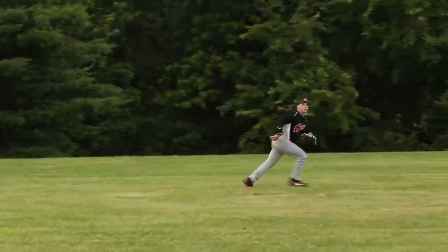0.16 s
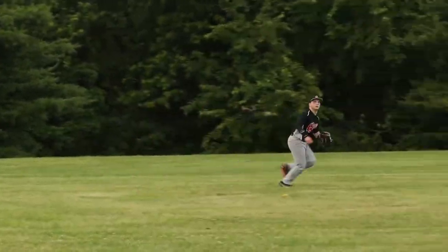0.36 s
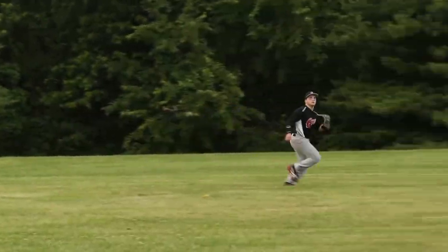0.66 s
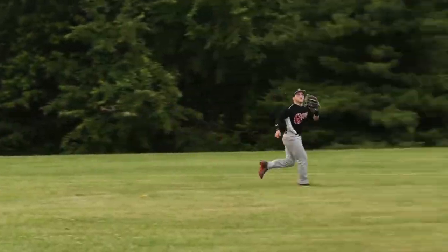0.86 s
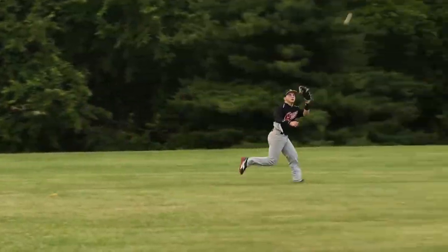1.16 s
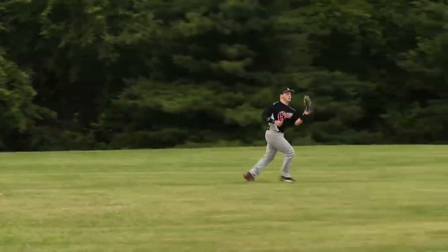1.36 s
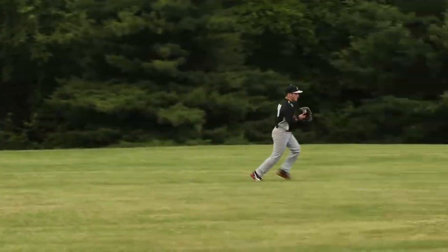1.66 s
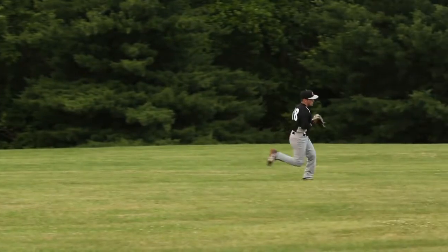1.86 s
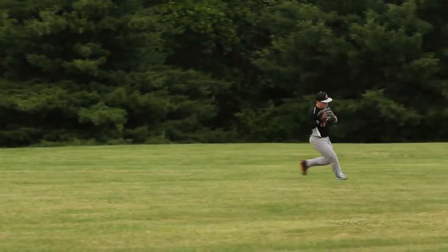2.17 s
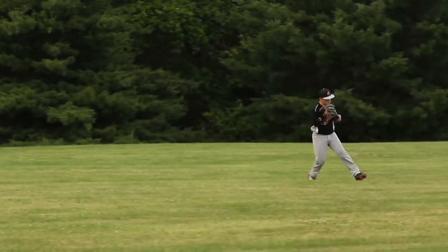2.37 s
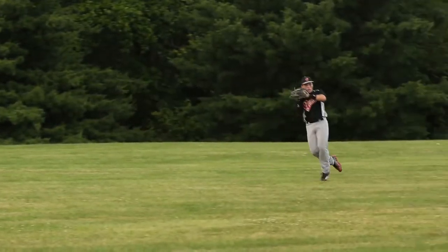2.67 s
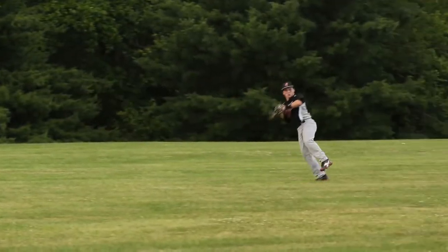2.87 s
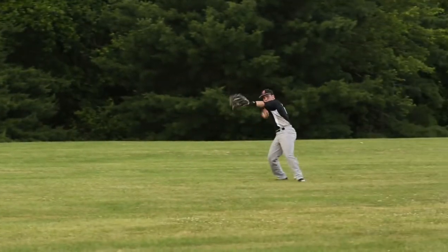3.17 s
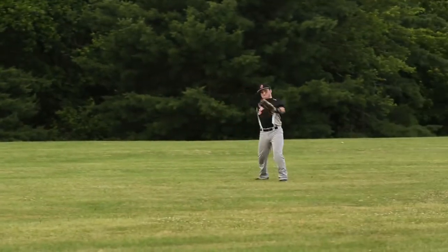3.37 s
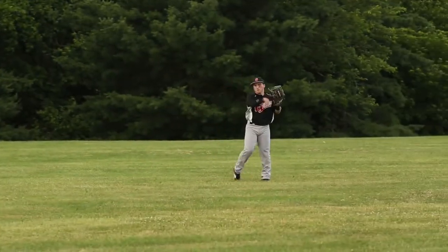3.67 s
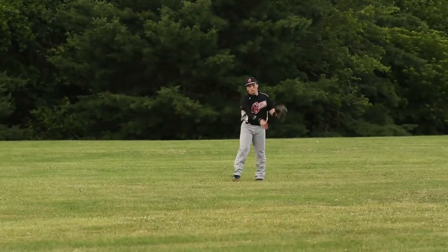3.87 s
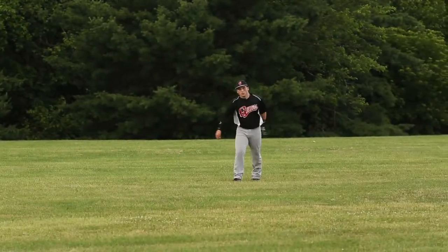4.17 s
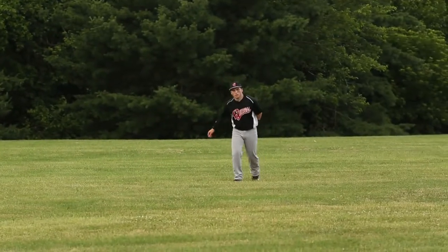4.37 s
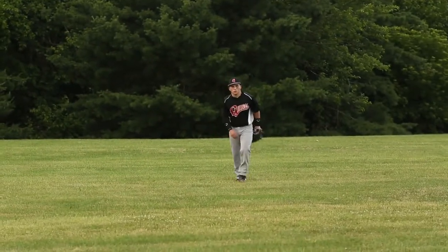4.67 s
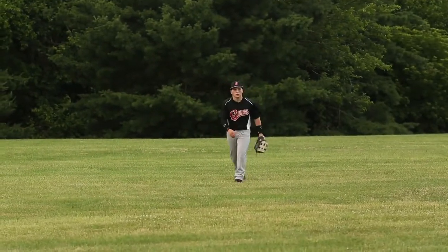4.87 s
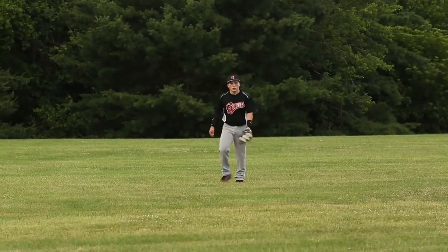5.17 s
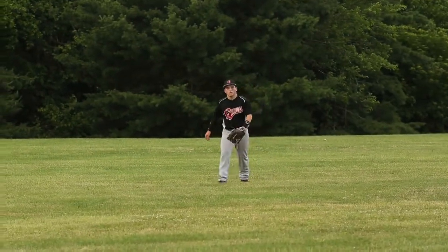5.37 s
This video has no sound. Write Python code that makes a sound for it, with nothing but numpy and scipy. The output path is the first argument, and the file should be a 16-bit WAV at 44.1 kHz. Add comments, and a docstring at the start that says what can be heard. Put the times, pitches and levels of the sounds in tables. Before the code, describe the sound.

On an open grass field, a distant engine drones, slowly rising in pitch over low road rumble and wind in the trees. A fielder runs with faint cleat crunches and sleeve swishes, then catches a baseball with a light leather snap. Small birds whistle softly with a little echo. The engine shifts gear and drops in pitch, and at the end a ball smacks sharply into a glove close to the microphone.

```python
"""A baseball smacks into a leather glove close by: a sharp slap over the falling thump of the padding.
Before it, a fielder runs over the grass, cleats crunching and sleeves swishing, and makes a lighter catch
that rings the pocket. Far off, a V8's exhaust drones up through a gear and shifts, with a lower motor
beneath it. Small birds whistle from the edge of a wood that echoes them, over a bed of road rumble,
far tyres and wind in the trees."""
import sys
import numpy as np
from scipy import signal
from scipy.fft import rfft, irfft
from scipy.io import wavfile

SR = 44100
rng = np.random.default_rng(int(sys.argv[2]) if len(sys.argv) > 2 else 0)


def pcm_store(signal):
    """Save signal as 16-bit PCM."""
    levels = np.round(np.clip(np.atleast_2d(signal), -1, 1) * 32767)
    wavfile.write(sys.argv[1], SR, levels.astype(np.int16).T)


N = 242991
T = np.arange(N) / SR

# tone of the road rumble: (frequency [Hz], relative level [dB])
RUMBLE_SPECTRUM = [(20, -19), (32, -9), (50, -0.5), (70, 4), (100, 6.5), (140, -1), (200, 1.5), (260, -8),
                   (340, -21.5), (600, -43)]
# tone of far tyres and wind in the trees: (frequency [Hz], relative level [dB])
WASH_SPECTRUM = [(150, 3), (300, 0.5), (420, -3), (640, 0.5), (900, 0), (1250, 1.5), (1700, -4),
                 (2400, -10), (3700, -16.5), (4600, -24.5), (6000, -33), (9000, -40), (15000, -26)]
# soft rustles of the player's clothes and the grass, plus one low, distant whoosh:
# (time [s], half length [s], centre [Hz], width [Hz], level [dB])
RUSTLE_SWELLS = [(.3, 0.24, 3140, 1900, -67.5), (0.445, .11, 2200, 1600, -60.5),
                 (1.357, .14, 3600, 1100, -65), (2.147, 0.32, 669, 190, -61.5),
                 (5.2, 0.13, 3520, 1700, -66.5)]
# single bird calls: (time [s], length [s], start pitch [Hz], end pitch [Hz], level [dB], echo send [dB])
WHISTLES = [(1.32, .1, 4170, 4150, -67, -10), (1.555, .06, 4420, 4340, -68, -8),
            (2.455, .028, 2050, 2070, -60, -10), (2.98, .1, 2930, 2640, -59, -15),
            (3.04, .09, 2970, 2480, -54.5, -15), (4.155, .075, 4740, 4700, -63, -2),
            (4.45, .025, 3250, 3050, -64, -8), (4.54, .1, 2640, 2730, -66, -8),
            (4.595, .08, 3950, 3990, -63, -10), (4.595, .095, 3800, 3790, -61, -4)]
# the lower motor speeds up and slackens: (time [s], firing rate [Hz], level [dB])
LOW_MOTOR_CURVE = [(2.3, 78, -72), (2.6, 79.3, -52.5), (3.65, 82.9, -48.5), (3.95, 84.7, -56.5),
                   (4.18, 84.4, -49), (5, 75.3, -58), (5.51, 73.7, -56)]
# the V8 nears and recedes, with a flare as the throttle lifts: (time [s], level [dB])
V8_ENVELOPE = [(0, -50.5), (.5, -47), (1.3, -41.5), (2.15, -40.5), (3, -42.5), (4.05, -48), (4.27, -52.5),
               (4.39, -41.5), (4.57, -55), (4.78, -49.5), (5.51, -49.5)]
# partials from the uneven firing of the two banks: (multiple of the engine cycle [x], base level [dB])
LOPE_PARTIALS = [(4, -56), (5, -51), (6, -56.5), (7, -69), (9, -68.5), (10, -58.5), (12, -52.5)]
# how exhaust and ground colour those partials: (frequency [Hz], gain [dB])
EXHAUST_EQ = [(70, -1), (95, 0), (112, -3), (130, -0.5), (145, -5.5), (165, 2), (225, -5.5), (252, -4.5),
              (268, -19.5), (298, -14), (320, -30)]
# cleats landing in the grass: (time [s], level [dB])
FOOTFALLS = [(.233, -47), (0.453, -51), (1.0305, -43), (4.888, -50.5)]
# tone of a cleat's crunch: (frequency [Hz], relative level [dB])
TURF_SPECTRUM = [(600, -11), (1300, 4), (2000, -3), (3000, -5), (3900, -2), (5000, -13.5), (7500, -19),
                 (12000, -30)]
# sleeve and glove swishes: (time [s], level [dB], t60 [s])
CLOTH_SWISHES = [(1.202, -59.5, 0.088), (1.286, -52.5, 0.042), (1.351, -55.5, .08), (1.401, -56, .06),
                 (1.488, -50, 0.029), (1.558, -54.5, .04), (1.614, -57, .06), (2.296, -56, 0.05),
                 (2.66, -62, .07)]
# resonances of the fielder's glove: (frequency [Hz], level [dB], t60 [s])
POCKET_MODES = [(284, -36, 0.017), (1050, -21, 0.02), (1345, -13, 0.0189), (1685, -17, 0.0171),
                (2428, -21, 0.0081), (3259, -5, 0.0114), (3821, -15, 0.0127), (5734, -18, 0.0076),
                (6516, -21, 0.0063)]
# the ball meets the web, seats in the pocket, the glove shuts: (time [s], gain [dB], contact time [s])
POCKET_HITS = [(1.46879, -23, 3.8e-05), (1.47115, -11, 7.6e-05), (1.47196, 4, 0.000282),
               (1.47311, 1, 8.8e-05), (1.4755, -13, 6.9e-05), (1.47631, -12, 0.000104),
               (1.47867, -8, 0.00017)]
# resonances of the near glove: (frequency [Hz], level [dB], t60 [s])
LEATHER_MODES = [(902, -23, 0.0119), (1445, -32, 0.0228), (2130, -19, 0.0065), (3248, -16, 0.0046),
                 (3690, -12, 0.0085), (4920, -23, 0.0063), (6199, -14, 0.0038), (7328, -21, 0.0046),
                 (8527, -13, 0.0038)]
# the ball strikes the near glove and the leather snaps round it: (time [s], gain [dB], contact time [s])
SLAP_HITS = [(5.38372, 0, 4e-05), (5.38415, -17, 2.8e-05)]


def undb(db):
    """Decibels to gain."""
    return 10 ** (np.asarray(db) / 20)


def unit(x):
    """Scale to an rms of 1."""
    return x / np.sqrt(np.mean(x ** 2))


def curves(table):
    """Automation lanes: each column after the first, ramped between its time points."""
    times, *columns = np.transpose(table)
    return [np.interp(T, times, column) for column in columns]


def eq_gain(points, hz):
    """Gain of an EQ curve at the given frequencies."""
    f, db = np.transpose(points)
    return undb(np.interp(np.log(hz + 1), np.log(f), db))


def drift(rate_hz):
    """Smooth random modulation of rms about 1, moving about rate_hz times a second."""
    f = np.arange(N + 1) * SR / (2 * N)
    return unit(irfft(rfft(rng.standard_normal(2 * N)) * np.exp(-(f / rate_hz) ** 2)))[:N]


def band(hz, width_hz):
    """Band-passed noise of rms 1."""
    f = np.arange(N // 2 + 1) * SR / N + 1
    return unit(irfft(rfft(rng.standard_normal(N)) / (1 + ((f - hz ** 2 / f) / width_hz) ** 2), N))


def noise_bed(points, flicker_db, flicker_hz):
    """Shaped noise of rms 1 whose octaves swell and sink on their own."""
    f = np.arange(N // 2 + 1) * SR / N
    spectrum = rfft(rng.standard_normal(N)) * eq_gain(points, f)
    octaves = (np.maximum(0, 1 - abs(np.log2(f + 1) - k)) for k in range(4, 15))
    return unit(sum(irfft(spectrum * octave, N) * undb(flicker_db * drift(flicker_hz))
                    for octave in octaves))


def fade(t, t60):
    """Exponential decay by 60 dB in t60."""
    return np.exp(-np.log(1000) * t / t60)


def attack(t, rise_s):
    """Rounded onset from 0 towards 1."""
    return 1 - np.exp(-t / rise_s)


def swell(s, half_length):
    """A smooth rise and fall centred on time s."""
    return np.exp(-((T - s) / half_length) ** 2 / 2)


def add(out, s, x):
    """Mix x into out from time s on."""
    i = int(np.clip(s * SR, 0, N - 1))
    out[i:i + len(x)] += x[:N - i]


def ring(modes, t):
    """Damped resonances, t seconds after a hit."""
    return sum(undb(db) * fade(t, t60) * np.cos(2 * np.pi * hz * t) for hz, db, t60 in modes)


def strike(modes, hits):
    """Each hit rings the same modes; a longer, softer contact sounds duller."""
    out, t = np.zeros(N), T[:SR // 10]
    f = np.arange(len(t) + 1) * SR / (2 * len(t))
    response = rfft(ring(modes, t), 2 * len(t))
    for s, db, contact_s in hits:
        softened = response / (1 + 2j * np.pi * f * contact_s) ** 2
        add(out, s, undb(db) * irfft(softened)[:len(t)])
    return out


def ambience(rumble_db=-49.5, build_db=7, build_s=0.21, wash_db=-52, rustle_db=-71):
    """The bed: road rumble easing in, an even wash of tyres and trees, grass and clothes rustling."""
    rumble_gain = undb(rumble_db - build_db * np.exp(-T / build_s))
    rumble = rumble_gain * noise_bed(RUMBLE_SPECTRUM, flicker_db=1.0, flicker_hz=4.5)
    wash = undb(wash_db) * noise_bed(WASH_SPECTRUM, flicker_db=0.83, flicker_hz=3.5)
    rustle = undb(rustle_db + 2.14 * drift(35)) * band(hz=3460, width_hz=1700)
    return rumble + wash + rustle


def rustle_swells(flicker_db=2.5):
    """Soft rustles of clothes and grass and one low, distant whoosh, each swelling in its own band."""
    return sum(undb(db + flicker_db * drift(18)) * swell(s, half_length) * band(hz, width_hz)
               for s, half_length, hz, width_hz, db in RUSTLE_SWELLS)


def trill(start_s=.035, period_s=.1215, note_s=.032, glide_hz=(4810, 4470), first_db=-64, send_db=-5):
    """One bird repeats a short falling note, a little weaker each time; rows as in WHISTLES."""
    count, fade_db_per_s = 8, 5
    return [(start_s + s, note_s, *glide_hz, first_db - fade_db_per_s * s, send_db)
            for s in period_s * np.arange(count)]


def birds(wood_t60=0.75, wood_build_s=.03, waver=0.0052):
    """Gliding whistles, scattered into a reverb tail by the trunks of the wood."""
    direct, send = np.zeros(N), np.zeros(N)
    wobble = 1 + waver * drift(160)
    for s, length, start_hz, end_hz, db, send_db in trill() + WHISTLES:
        progress = np.linspace(0, 1, int(length * SR))
        glide_hz = start_hz + (end_hz - start_hz) * progress
        hz = glide_hz * np.roll(wobble, -int(s * SR))[:len(progress)]
        envelope = undb(db) * np.sqrt(2) * np.sin(np.pi * progress)
        note = envelope * np.sin(2 * np.pi * np.cumsum(hz) / SR)
        add(direct, s, note)
        add(send, s, undb(send_db) * note)
    tail = rng.standard_normal(SR) * fade(T[:SR], wood_t60) * attack(T[:SR], wood_build_s)
    return direct + signal.fftconvolve(send, tail / np.linalg.norm(tail))[:N]


def low_motor(waver=0.011, flutter_db=2.5):
    """A low hum far off: only the motor's firing tone carries."""
    hz, db = curves(LOW_MOTOR_CURVE)
    phase = 2 * np.pi * np.cumsum(hz * (1 + waver * drift(6.7))) / SR
    return np.sqrt(2) * undb(db + flutter_db * drift(3.2)) * np.sin(phase)


def v8_firing_hz(start_hz=172.95, climb_hz_per_s=13.1, shift_at_s=4.27, shift_s=.48, next_gear_hz=148.6):
    """The pitch climbs evenly under full throttle, slides down through the shift, then holds."""
    climb = start_hz + climb_hz_per_s * np.minimum(T, shift_at_s)
    progress = np.clip((T - shift_at_s) / shift_s, 0, 1)
    return climb + (next_gear_hz - climb) * np.sin(np.pi / 2 * progress) ** 1.6


def v8(lope_follow=0.2, fading_db=2, flutter_db=1.27, waver=0.0026):
    """Eight firings a cycle give the lead tone; uneven banks add partials that fade in the moving air."""
    db, = curves(V8_ENVELOPE)
    cycle_hz = v8_firing_hz() / 8
    phase = 2 * np.pi * np.cumsum(cycle_hz * (1 + waver * drift(8.1))) / SR
    out = undb(db + flutter_db * drift(8)) * np.sin(8 * phase)
    for order, base_db in LOPE_PARTIALS:
        gain = undb(base_db + lope_follow * (db - db.mean()) + fading_db * drift(1.7))
        partial = np.sin(order * phase + 2 * np.pi * rng.random())
        out += gain * eq_gain(EXHAUST_EQ, order * cycle_hz) * partial
    return np.sqrt(2) * out


def cleats(t60=0.032, attack_s=0.00032):
    """Each footfall bites the turf with a short, broad crunch."""
    out, t = np.zeros(N), T[:SR // 5]
    turf = eq_gain(TURF_SPECTRUM, np.arange(len(t) // 2 + 1) * SR / len(t))
    for s, db in FOOTFALLS:
        crunch = unit(irfft(rfft(rng.standard_normal(len(t))) * turf, len(t)))
        add(out, s, undb(db) * crunch * attack(t, attack_s) * fade(t, t60))
    return out


def swishes(attack_s=0.00032):
    """Sleeve and glove brush in quick bursts of bright noise."""
    out, t = np.zeros(N), T[:SR // 5]
    cloth = band(hz=3550, width_hz=1300)
    for s, db, t60 in CLOTH_SWISHES:
        burst = cloth[int(s * SR):][:len(t)]
        add(out, s, undb(db) * burst * attack(t, attack_s) * fade(t, t60))
    return out


def running_catch(scrape_db=-31, scrape_half_s=0.0025, crack_db=-41, crack_t60=0.011):
    """A tight cluster of hits rings the pocket; the ball seats with a crack and scrapes the leather."""
    out, t = strike(POCKET_MODES, POCKET_HITS), T[:SR // 20]
    seated_s = max(POCKET_HITS, key=lambda hit: hit[1])[0]
    crack = band(hz=10700, width_hz=5200)[:len(t)] * fade(t, crack_t60)
    add(out, seated_s, undb(crack_db) * crack)
    scrape = band(hz=3690, width_hz=590) * swell(seated_s, scrape_half_s)
    return out + undb(scrape_db) * scrape


def padding_thump(t, start_hz=731, end_hz=154, fall_s=.003, db=-9.1, t60=.029):
    """The body of the near catch: the padding gives way, its pitch diving as it dies."""
    hz = end_hz + (start_hz - end_hz) * np.exp(-t / fall_s)
    return undb(db) * np.sin(2 * np.pi * np.cumsum(hz) / SR) * fade(t, t60)


def near_catch(at_s=5.3836, hand_hz=133.4, hand_db=-44, hand_t60=0.26, hand_rise_s=.006):
    """A sharp slap rings the leather over the thump; glove and hand wobble a moment longer."""
    out, t = strike(LEATHER_MODES, SLAP_HITS), T[:SR // 5]
    wobble = ring([(hand_hz, hand_db, hand_t60)], t) * attack(t, hand_rise_s)
    add(out, at_s, padding_thump(t) + wobble)
    # the leather first moves inward, so the pressure starts by dropping
    return -out


def scene():
    """The mono mix: the background layers, the running fielder and the close catch on top."""
    background = v8() + low_motor() + ambience() + rustle_swells() + birds()
    fielder = cleats() + swishes() + running_catch()
    return (background + fielder + near_catch())[None]


def record(dry, low_cut_hz=65, hiss_db=-63.5, high_cut_hz=15800):
    """The microphone drops the deepest bass and adds an even hiss; a steep filter cuts the top."""
    low_cut = signal.butter(2, low_cut_hz, "high", fs=SR, output="sos")
    high_cut = signal.ellip(10, .1, 70, high_cut_hz, fs=SR, output="sos")
    hiss = undb(hiss_db) * rng.standard_normal(dry.shape)
    return signal.sosfilt(high_cut, signal.sosfilt(low_cut, dry) + hiss)


dry = scene()
out = record(dry)
pcm_store(out)
```